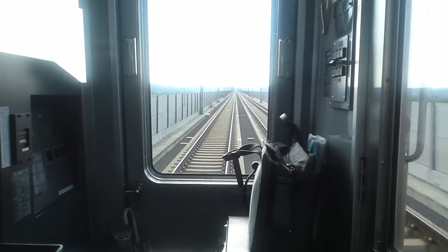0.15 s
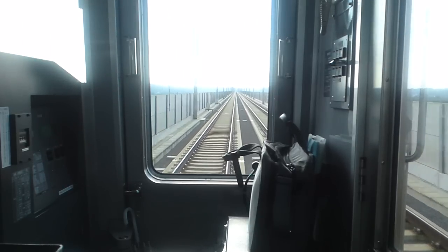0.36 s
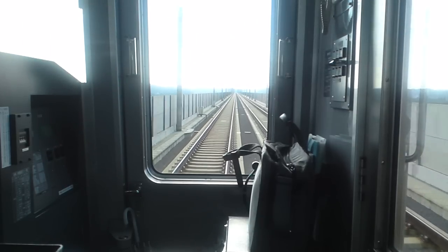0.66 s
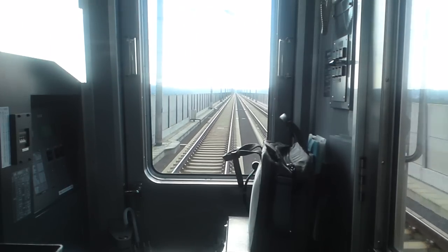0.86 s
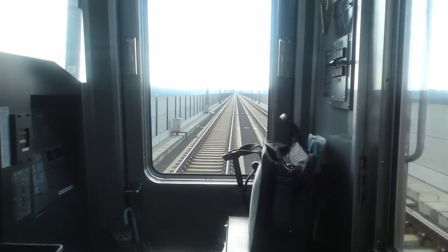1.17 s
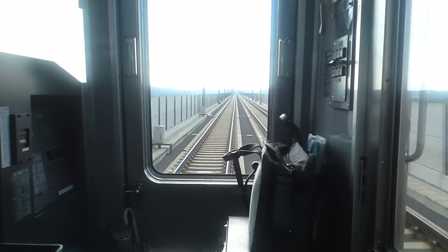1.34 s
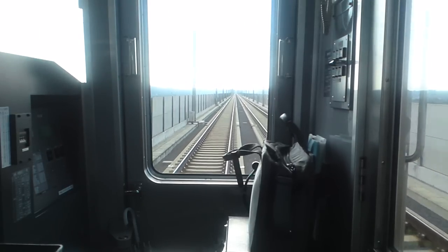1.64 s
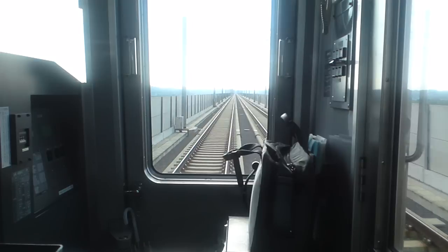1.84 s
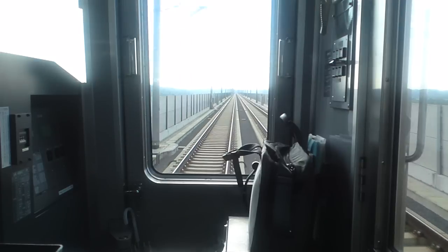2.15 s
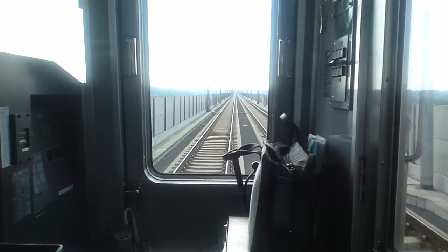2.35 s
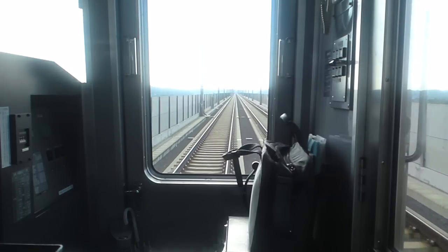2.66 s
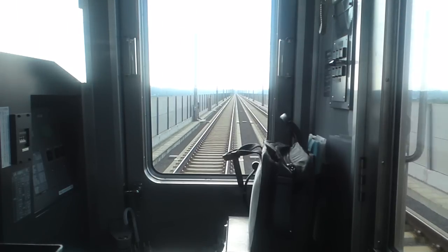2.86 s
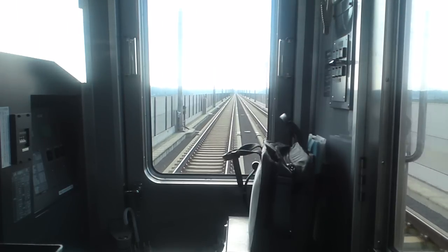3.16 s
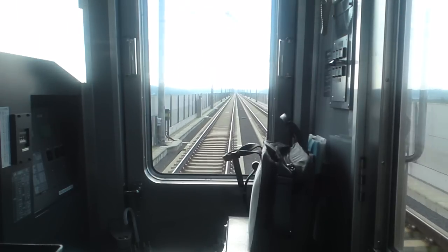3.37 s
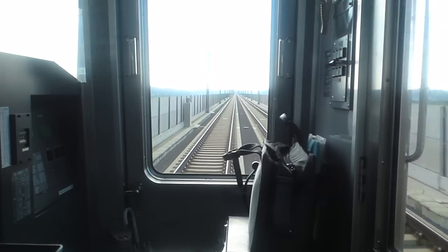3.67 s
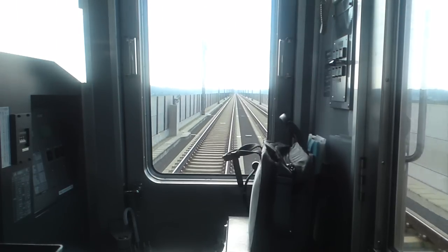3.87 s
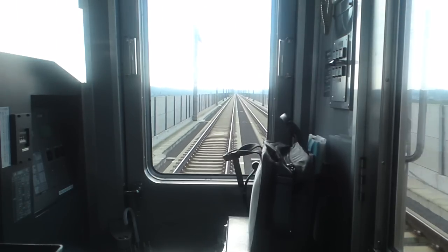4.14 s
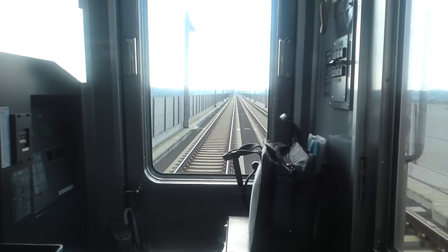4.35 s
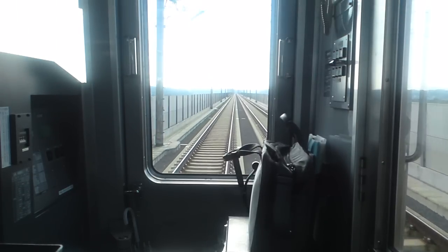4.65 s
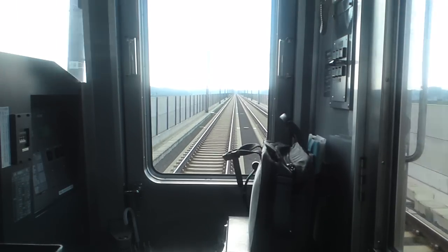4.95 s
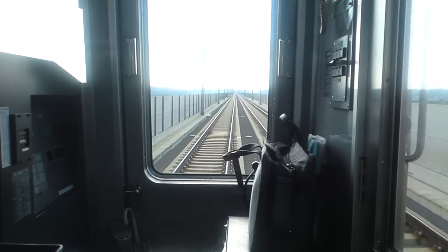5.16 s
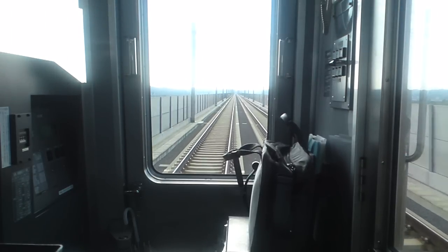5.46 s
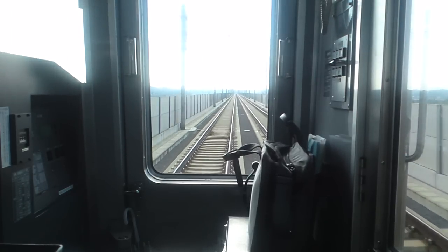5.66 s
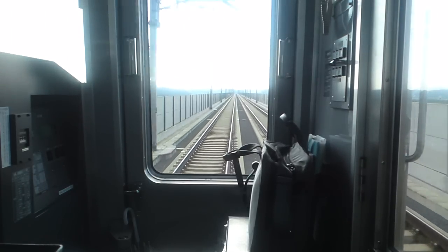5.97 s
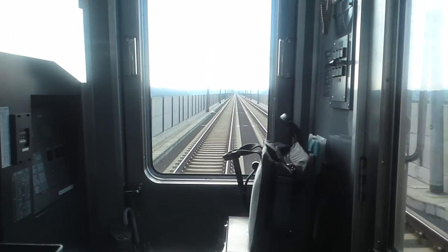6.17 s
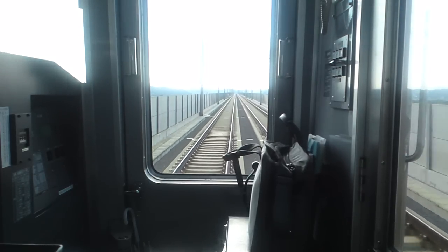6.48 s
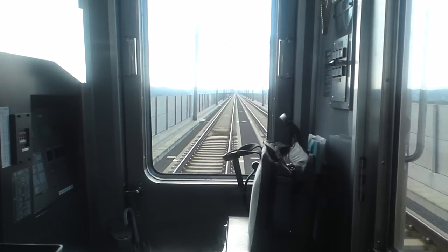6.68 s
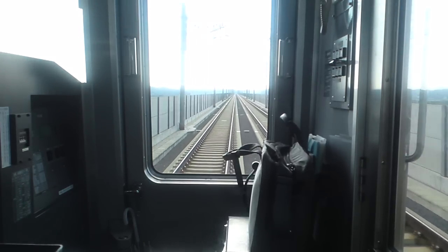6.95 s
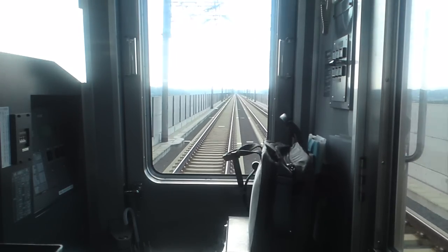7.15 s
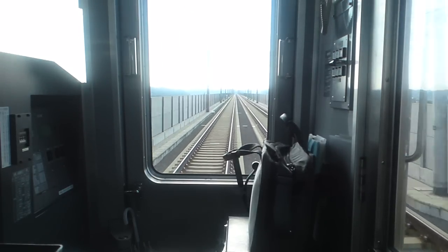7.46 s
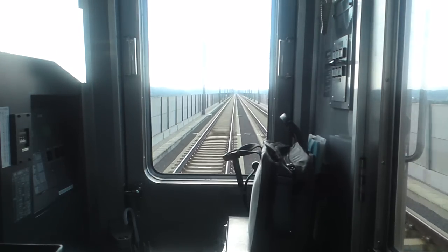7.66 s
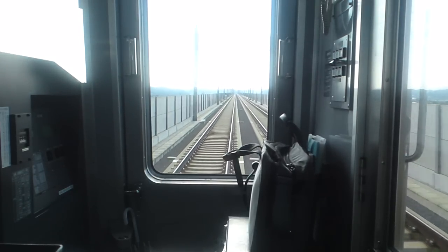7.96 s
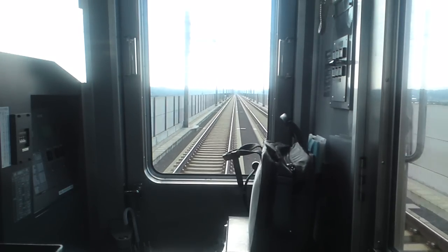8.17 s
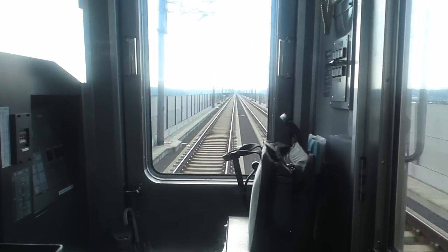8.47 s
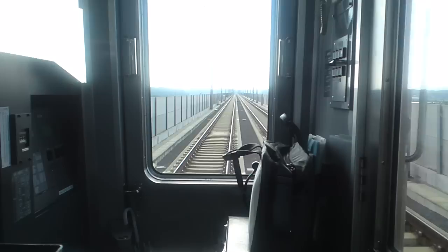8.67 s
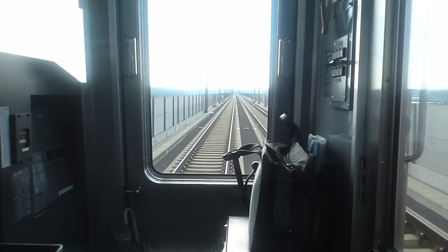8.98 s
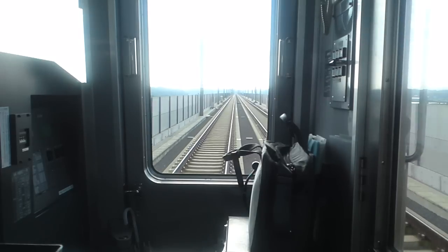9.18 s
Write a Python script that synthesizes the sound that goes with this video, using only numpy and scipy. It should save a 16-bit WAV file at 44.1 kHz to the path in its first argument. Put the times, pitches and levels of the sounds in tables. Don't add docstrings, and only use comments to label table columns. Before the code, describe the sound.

Continuous cab ambience of an electric train: a low droning hum from wheels passing sleepers, briefly dipping and changing its buzz on uneven track. Rolling rumble shakes the floor, a grainy mid-range roar comes from the rails, and thin patchy hiss from air outside. Faint high whine comes and goes. Close, enclosed, dull stereo from a small camera, with no distinct impacts.

```python
import sys
import numpy as np
from scipy import signal
from scipy.fft import rfft, irfft, dct, next_fast_len
from scipy.io import wavfile
from scipy.ndimage import map_coordinates

SR = 44100
rng = np.random.default_rng(int(sys.argv[2]) if len(sys.argv) > 2 else 0)


def unload_audio(sound):
    columns = np.transpose(np.atleast_2d(sound))
    steps = np.round(np.clip(columns, -1, 1) * 32767)
    wavfile.write(sys.argv[1], SR, steps.astype(np.int16))


def attenuation_scalar(level_db):
    decades = np.asarray(level_db, float) / 20
    return 10 ** decades


N = 411012
SLOTS_PER_SLEEPER = 46
HOP = 940


def along(points, hz):
    f, value = np.transpose(points)
    return np.interp(np.log(hz + 1), np.log(f + 1), value)


def wobble(rate):
    knots = rng.standard_normal(int(N * rate / SR) + 4)
    return map_coordinates(knots, [np.arange(N) * rate / SR])


def ramp(at_s, lasts_s):
    t = np.arange(N) / SR
    return 0.5 + 0.5 * np.tanh((t - at_s) / max(lasts_s, 0.01))


# f/Hz, side minus mid level/dB
STEREO_WIDTH = [(150, -69), (300, -41.5), (450, -29.5), (800, -21.5), (1000, -25.5), (1400, -24.5),
                (1600, -19), (2500, -15), (3500, -11.5), (5000, -13), (8000, -11)]


def rush(spectrum, modes=()):
    size = next_fast_len(N)
    hz = np.fft.rfftfreq(size, 1 / SR)
    peaks_db = sum(db / (1 + (2 * (hz - centre) / width) ** 2) for centre, width, db in modes)
    mid_gain = attenuation_scalar(along(spectrum, hz) + peaks_db) * (hz > 4)
    gain = mid_gain * [np.ones_like(hz), attenuation_scalar(along(STEREO_WIDTH, hz))]
    pair = irfft(rfft(rng.standard_normal((2, size))) * gain)[:, :N]
    return pair / pair[0].std()


# f/Hz, density level/dB per Hz
AIR_SPECTRUM = [(2500, -17.5), (3500, -1.5), (4500, -2), (5200, -6), (6400, -8.5), (6700, -6.5),
                (7200, -18), (8200, -7.5), (9100, -17)]
# f/Hz, width/Hz, level/dB
WHEEL_MODES = [(1339, 81, 6), (1411, 58, 6), (1937, 69, 4.5), (2050, 120, 6), (2570, 31, 6.5),
               (2722, 130, 7.5), (2832, 40, 4), (3326, 59, 4.5), (3690, 47, 4.5), (4480, 140, 1),
               (5940, 120, 2.5)]


def air_rush(rough):
    t = np.arange(N) / SR
    level_db = -43.5 - 0.09 * t + 0.6 * rough + 0.99 * wobble(14)
    return attenuation_scalar(level_db) * rush(AIR_SPECTRUM, WHEEL_MODES)


# f/Hz, density level/dB per Hz
RAIL_SPECTRUM = [(300, -31.5), (560, -8), (750, -0.5), (1000, -3), (1200, -4), (1700, -7.5), (2300, -12.5),
                 (2500, -19), (3100, -20), (3500, -25), (4500, -37)]


def rail_roar(rough):
    t = np.arange(N) / SR
    level_db = -24 - 0.1 * t + 0.5 * rough + 0.3 * wobble(24)
    return attenuation_scalar(level_db) * rush(RAIL_SPECTRUM, WHEEL_MODES)


# f/Hz, density level/dB per Hz
FLOOR_SPECTRUM = [(8, -15), (18, 1.5), (45, -1), (62, 2.5), (95, -0.5), (120, -7.5), (150, -0.5), (170, -6),
                  (270, -4), (315, -5), (335, -11), (480, -14), (620, -21.5), (900, -48.5)]
# f/Hz, width/Hz, level/dB
PANEL_MODES = [(205.4, 5, 9), (210.4, 6.5, 2.5), (249.5, 6, 3), (305.6, 5.3, 3), (377, 29, 3),
               (431, 4.7, 5), (501, 15, 3), (544.5, 9, 7)]


def floor_rumble():
    t = np.arange(N) / SR
    level_db = -15 - 0.25 * t + 0.6 * wobble(5)
    return attenuation_scalar(level_db) * rush(FLOOR_SPECTRUM, PANEL_MODES)


# t/s, length/s, whine rise level/dB
MOTOR_LOADS = [
    (0.619, 0.42, 6.5),
    (1.521, .15, 9.5),
    (2.62, 1.62, 8.5),
    (4.565, 0.55, 12),
    (5.298, .3, 7),
    (5.62, .6, 9),
    (6.378, 1.3, 10.5),
    (8.002, .7, 7.5),
    (9.05, .25, 8),
]


def motor(cycle):
    swell_s = 0.09
    load_db = sum(db * (ramp(start, swell_s) - ramp(start + length, swell_s))
                  for start, length, db in MOTOR_LOADS)
    level_db = -59 + load_db + 2.2 * wobble(16)
    return np.sqrt(2) * attenuation_scalar(level_db) * np.cos(SLOTS_PER_SLEEPER * cycle + 0.4 * wobble(25))


def gears(cycle):
    meshes_per_sleeper = 18.85
    level_db = -37 - 2 * np.arange(N) / SR + 1.8 * wobble(5)
    return np.sqrt(2) * attenuation_scalar(level_db) * np.cos(meshes_per_sleeper * cycle + 0.6 * wobble(8))


# t/s, length/s, sag change level/dB, sharpness change level/dB
UNEVEN_TRACK = [(0.498, .2, -1.5, 3), (.83, 0.069, -7.5, -1), (2.402, 0.25, 0.5, 3), (2.672, 0.16, -1, -5),
                (3.604, .3, -5.5, -4.5), (4.502, 0.45, 1.5, 3.5), (5.313, .12, -8, -4),
                (6.101, 0.33, 1, -5), (7.094, .5, 3, 0.5), (7.8, 0.48, 0, -4.5), (8.242, 0.077, -2.5, -2),
                (8.945, .5, -1.5, 5)]


def sleepers(cycle):
    t = np.arange(N) / SR
    sag_db, sharp_db = sum(np.outer([sag, sharp], np.exp(-(2 * (t - middle) / length) ** 2))
                           for middle, length, sag, sharp in UNEVEN_TRACK)
    slip = 2 * np.pi * 0.5 * ramp(0.83, 0.02)
    first_db = -14.5 - 0.34 * t + sag_db
    second_db = -24 - 0.7 * t + 1.05 * sharp_db + 1.6 * wobble(2.3)
    fourth_db = -24.5 - 1.4 * t + 0.4 * sharp_db + 1.4 * wobble(2.5)
    hum = attenuation_scalar(first_db) * np.cos(cycle - slip + 0.072 * wobble(6))
    hum += attenuation_scalar(second_db) * np.cos(2 * cycle + 0.5 + 0.18 * wobble(5))
    hum += attenuation_scalar(fourth_db) * np.cos(4 * cycle + np.pi + 0.65 * wobble(5))
    return np.sqrt(2) * hum


def scene():
    t = np.arange(N) / SR
    slot_hz = 3392 - 6.6 * t - 0.33 * t ** 2
    cycle = 2 * np.pi * np.cumsum(slot_hz) / SR / SLOTS_PER_SLEEPER
    rough = wobble(9)
    mid, side = floor_rumble() + rail_roar(rough) + air_rush(rough)
    mid = mid + motor(cycle) + gears(cycle) + sleepers(cycle)
    side = attenuation_scalar(2.9) * side
    return np.array([mid + side, mid - side])


BAND_EDGES = [0, 4, 8, 12, 16, 20, 24, 28, 32, 36, 40, 48, 56, 64, 72, 80, 88, 96, 108, 120, 132, 144, 160,
              176, 196, 216, 240, 264, 292, 320, 352, 385]


def lapped(x, back=False):
    window = signal.windows.kaiser_bessel_derived(2 * HOP, 3 * np.pi)
    if not back:
        padded = np.pad(x, [(0, 0), (HOP, 2 * HOP)])
        frames = np.lib.stride_tricks.sliding_window_view(padded, 2 * HOP, 1)[:, ::HOP] * window
        a, b, c, d = np.split(frames, 4, -1)
        folded = np.dstack([-c[..., ::-1] - d, a - b[..., ::-1]])
        return dct(folded, type=4, norm="ortho")[..., :BAND_EDGES[-1]]
    late, early = np.split(dct(x, type=4, n=HOP, norm="ortho"), 2, -1)
    frames = np.dstack([early, -early[..., ::-1], -late[..., ::-1], -late]) * window
    joined = frames[:, 1:, :HOP] + frames[:, :-1, HOP:]
    return joined.reshape(len(x), -1)[:, :N]


# f/Hz, budget/sigma
MID_DROPOUT = [(2000, -3.3), (4500, -2.4), (5400, -1.45), (6500, -.75), (7200, 0), (7900, -.1),
               (8600, -.15)]
# f/Hz, budget/sigma
SIDE_DROPOUT = [(300, 1.7), (600, -.2), (950, .2), (1300, 1.5), (1450, .6), (1650, -.3), (3200, -.1),
                (3600, .4), (4900, .9), (5500, 1.2), (7200, 1.4), (7900, 1.1)]
# f/Hz, level over rounding step/dB
MID_FINENESS = [(300, 18), (1500, 6), (2200, -1), (2700, -4.5), (3300, -6), (4500, -5.5), (8800, -5)]


def starve(dry):
    shared, linger = 0.55, 0.7
    lines = lapped(np.array([dry[0] + dry[1], dry[0] - dry[1]]) / 2)
    frame_count = lines.shape[1]
    band = np.repeat(np.arange(len(BAND_EDGES) - 1), np.diff(BAND_EDGES))
    hz = np.convolve(BAND_EDGES, [0.5, 0.5], "valid") * SR / 2 / HOP

    draw = rng.standard_normal((2, frame_count + 1, len(BAND_EDGES)))
    draw = (draw[:, 1:] + linger * draw[:, :-1]) / np.hypot(1, linger)
    budget = shared * draw[..., -1:] + np.sqrt(1 - shared ** 2) * draw[..., :-1]
    from_middle_s = (np.arange(frame_count)[:, None] * HOP - N / 2) / SR
    budget[0] -= 0.05 * from_middle_s
    kept = budget > np.array([along(MID_DROPOUT, hz), along(SIDE_DROPOUT, hz)])[:, None]
    kept[1] &= kept[0]

    band_power = np.add.reduceat(np.mean(lines ** 2, 1), BAND_EDGES[:-1], 1) / np.diff(BAND_EDGES)
    level = np.sqrt(band_power)[:, None]
    fine_db = np.array([along(MID_FINENESS, hz), -7 + 0 * hz])[:, None] + 2.2 * budget
    step = (level / attenuation_scalar(fine_db))[..., band]
    whole = np.floor(abs(lines / step) ** 0.75 + 0.4054)
    mid, side = np.sign(lines) * step * whole ** (4 / 3) * kept[..., band]
    lost = (band == band[-1]) & (draw[0, :, -1:] < 2.1)
    left = np.where(lost, 0, mid + side)
    right = np.where(lost, mid, mid - side)
    return lapped(np.array([left, right]), back=True)


def top_cut(x):
    return signal.sosfilt(signal.butter(12, 9320, fs=SR, output="sos"), x)


def record(dry):
    held = dry / (1 + abs(dry / 1.08) ** 6) ** (1 / 6)
    return top_cut(starve(held))


dry = scene()
out = record(dry)
unload_audio(out)
```